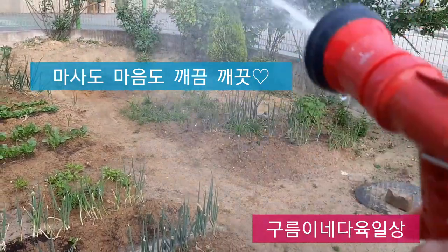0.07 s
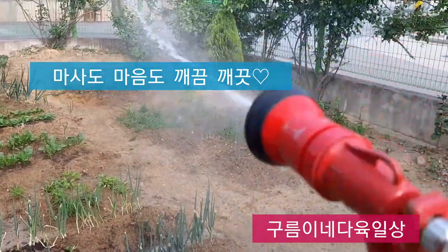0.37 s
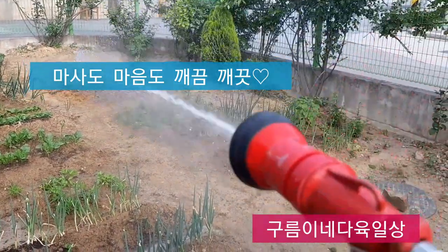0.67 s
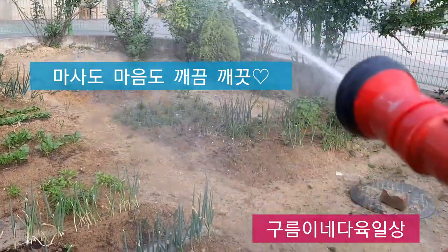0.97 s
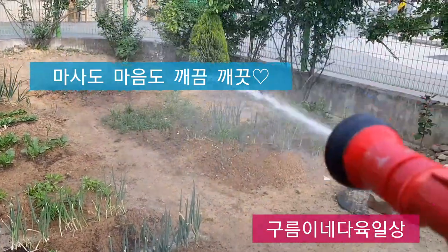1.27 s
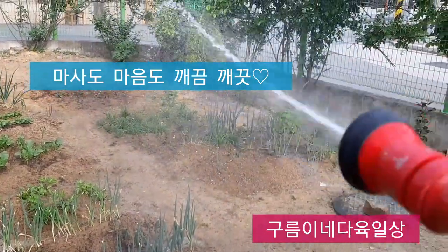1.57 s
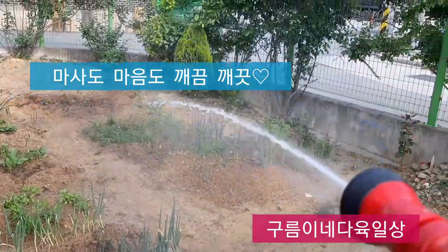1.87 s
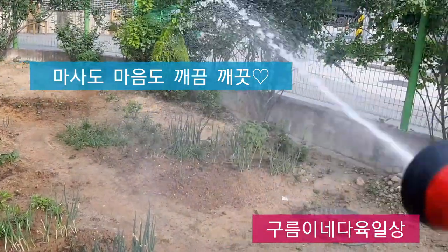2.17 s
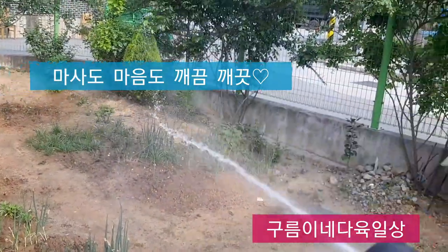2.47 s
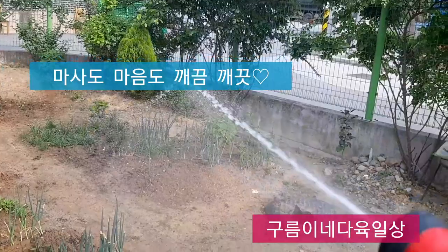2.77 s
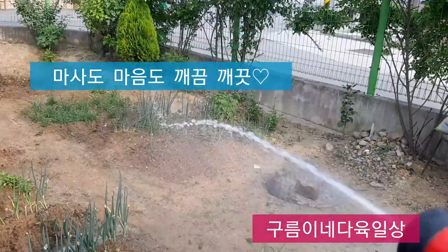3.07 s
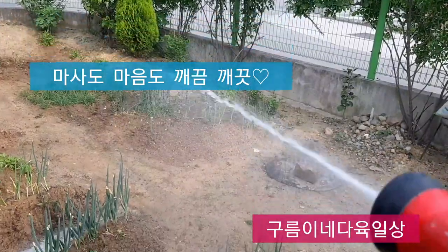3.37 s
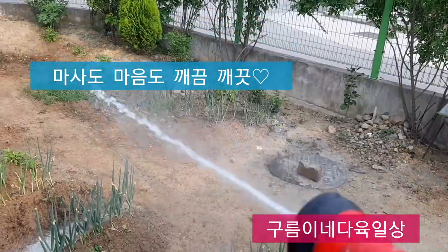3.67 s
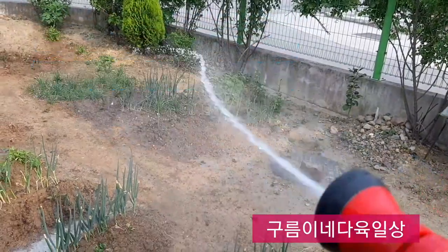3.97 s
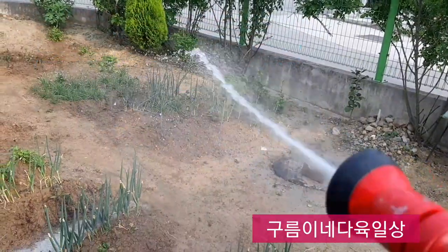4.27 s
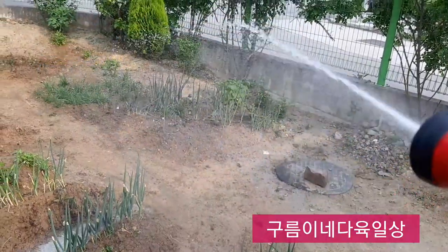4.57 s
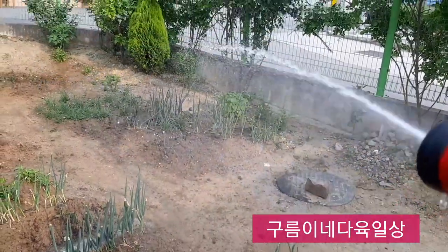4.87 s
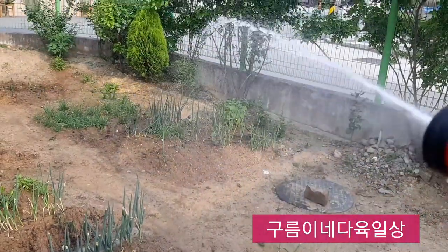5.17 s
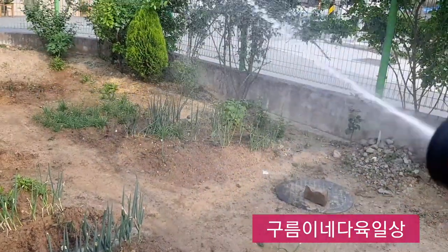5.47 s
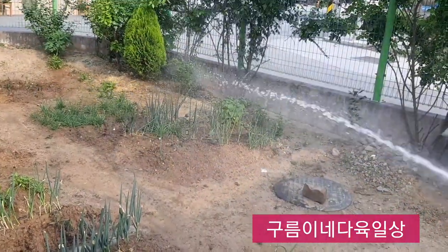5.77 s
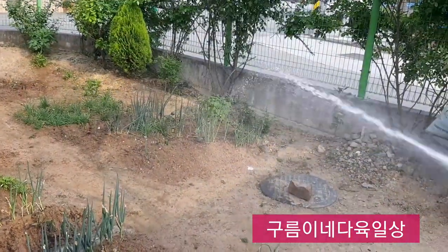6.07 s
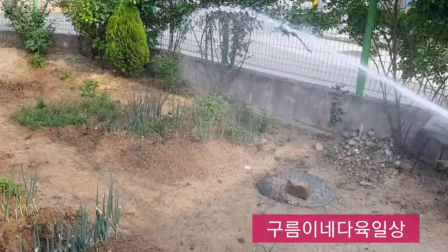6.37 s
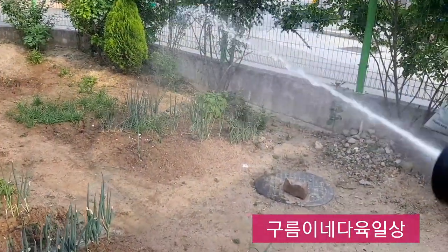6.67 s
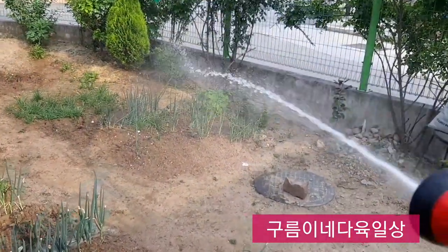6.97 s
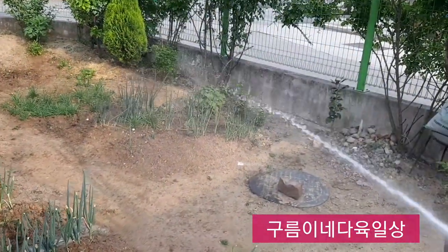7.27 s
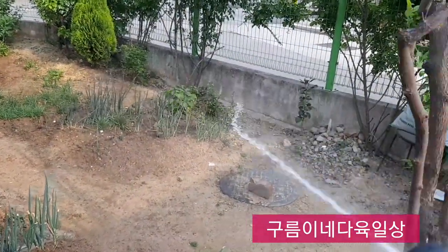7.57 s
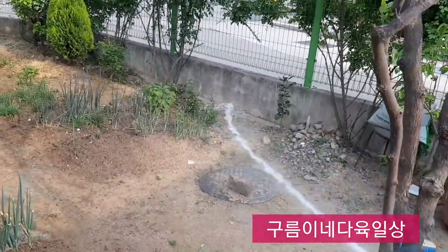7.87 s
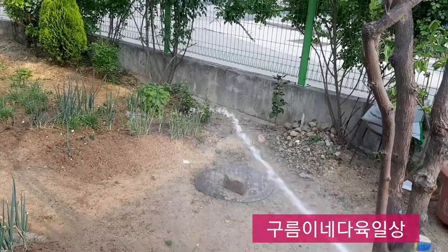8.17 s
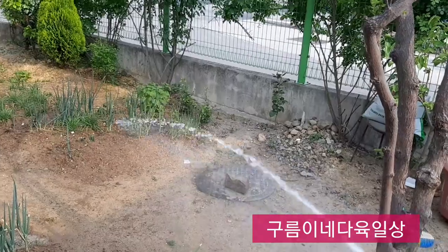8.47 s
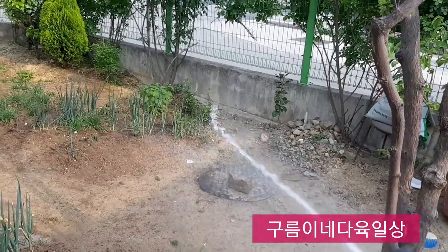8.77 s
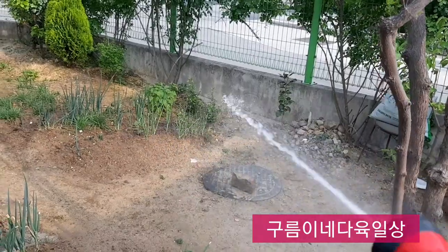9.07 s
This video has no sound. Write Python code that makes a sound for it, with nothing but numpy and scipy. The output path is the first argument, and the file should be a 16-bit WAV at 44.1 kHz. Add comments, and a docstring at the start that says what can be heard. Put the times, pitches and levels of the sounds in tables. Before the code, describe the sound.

Close, steady hiss of a sweeping garden hose spray, with water drumming on earth and ticking on leaves, and a low faraway rumble.

```python
"""A hose nozzle over a vegetable bed, close to a hand-held phone with two microphone ports.
From the start the jet hisses as it tears into drops, echoed by the gardener's body; further off, water
patters on soil and ticks on leaves, over a distant rumble and machine hum. The nozzle swings left and
back, then sweeps to and fro, and from about 3 s slugs of water drum on the soil. From 4.7 to 7.5 s it
stays to the right, hollow and ringing. Last come more quick strokes and slugs as the rumble rises."""
import sys
import numpy as np
from scipy import signal
from scipy.fft import rfft, irfft
from scipy.io import wavfile
from scipy.ndimage import uniform_filter1d, map_coordinates

SR = 44100
rng = np.random.default_rng(int(sys.argv[2]) if len(sys.argv) > 2 else 0)


def master_out(mix):
    """Clip the mix to full scale and print it as 16-bit PCM to the path in sys.argv[1]."""
    frames = np.transpose(np.atleast_2d(mix))
    ceiling = np.clip(frames, -1, 1)
    pcm = np.round(ceiling * 32767).astype(np.int16)
    wavfile.write(sys.argv[1], SR, pcm)


N = 401751
TIME = np.arange(N) / SR

# turning points of the sweep: time_s, lag_ms (left port behind right; positive with the nozzle to the right)
SWEEP_TURNS = [(0.17, .014), (0.65, -.1), (0.82, -.103), (0.97, .025), (2.02, .022), (2.26, .092),
               (2.56, .036), (3.37, .078), (3.79, -.028), (4.01, .097), (4.18, -.008), (4.33, .092),
               (4.49, .01), (4.68, .145), (5.55, .13), (6.05, .19), (6.35, .155), (7.52, .152),
               (7.75, .082), (7.92, .111), (8.11, .039), (8.27, .083), (8.46, -.02), (8.72, .082),
               (8.95, .056), (9.11, .112)]
# the hand brings the nozzle nearer or further: time_s, gain_db
NOZZLE_NEARNESS = [(0, 1.5), (0.65, -.3), (1.65, .6), (2.03, -.7), (2.26, 1.6), (2.47, -1), (3.8, .8),
                   (4.55, .1), (5.2, .7), (6.1, -1), (6.45, .7), (7.5, -.9), (8.2, -.6), (8.47, .6),
                   (8.8, -.6), (9.11, .1)]
# colour of the close hiss at each port: frequency_hz, gain_db
LEFT_HISS_COLOUR = [(500, -34), (1200, -23.5), (1800, -15), (2300, -11), (2750, -8.5), (3300, -2),
                    (4000, 2), (5000, 0.2), (6200, -5.5), (7400, -4.5), (8400, -13), (10500, -9.5),
                    (14000, -13), (15700, -15)]
RIGHT_HISS_COLOUR = [(500, -36), (1200, -27.5), (1800, -18.5), (2300, -15.5), (3000, -6.5), (3800, -3.0),
                     (4600, -0.53), (5300, -1), (6200, -3.5), (7000, -5.5), (8300, -16.5), (10800, -16.5),
                     (14000, -19), (15700, -19.5)]
# colour of the fine mist, of water on soil and of drops on leaves: frequency_hz, gain_db
MIST_COLOUR = [(1000, -3.5), (4000, -12.5), (7000, -5), (10000, 0), (15000, 1.5)]
SOIL_DRUM_COLOUR = [(100, -23), (250, -1.5), (450, -3.5), (800, 1.5), (1200, -9.5), (2000, -7.5),
                    (6000, -38)]
LEAF_TICK_COLOUR = [(400, -23.5), (1200, -12.5), (2200, -5), (4500, 2), (8000, -10), (15000, -9.5)]
# slugs of water landing on bare soil: start_s, length_s, level_db
WATER_SLUGS = [(2.85, 0.18, -54.5), (3.19, .22, -48.5), (3.65, 0.19, -52.5), (4.41, .07, -50),
               (4.66, 0.12, -57), (6.1, .2, -57), (7.86, .11, -47.5), (8.25, .09, -51), (8.58, 0.071, -51),
               (8.82, 0.25, -54.5)]
# colour of the distant rumble, mid and side: frequency_hz, gain_db
RUMBLE_MID_COLOUR = [(20, -27), (40, -17), (60, -7), (100, -1.5), (122, -5.5), (150, 3), (220, 1.5),
                     (310, -7), (460, -14), (750, -10), (1150, -18), (3000, -25)]
RUMBLE_SIDE_COLOUR = [(20, -18), (90, -6), (220, 0.5), (450, -3), (800, 1), (1300, -1), (3000, -20)]
# course of the rumble's mid signal: time_s, level_db
RUMBLE_COURSE = [(0, -53.5), (7.4, -52.5), (9.11, -49)]
# tones of a distant machine: pitch_hz, level_db, swell_share (0-1, of both throb and swells)
MACHINE_TONES = [(91.5, -67, .7), (162, -58.5, 1), (360, -73.5, .2), (602.5, -69.5, .1)]
# brief swells of the machine: peak_s, rise_db
MACHINE_SWELLS = [(1.3, 7), (5.6, 6)]


def nozzle():
    """Close up: a compact hiss at the nozzle mouth, moving across the ports, and a wide fizz of mist."""
    lag_ms = hand_sweep(SWEEP_TURNS)
    near_db = curve(NOZZLE_NEARNESS) + 0.2 * walk(6)  # the hand wobbles
    left_db = -27.5 - 10 * lag_ms + near_db
    right_db = -24 + 2.5 * lag_ms + near_db
    body_sway_ms = 0.008 * walk(2.005)
    jet = breakup()
    left, right = body_reflection(jet, lag_ms, body_sway_ms)
    left, right = phone_shade(delay(left, lag_ms / 2), delay(right, -lag_ms / 2), lag_ms)
    ports = []
    for direct, points, db in ((left, LEFT_HISS_COLOUR, left_db), (right, RIGHT_HISS_COLOUR, right_db)):
        # the finest drops sound all along the fan, so the treble is the widest
        mist = colour(breakup(), MIST_COLOUR)
        heard = direct + undb(1) * mist + undb(-10.5) * surroundings(jet)
        ports.append(colour(heard, points) * undb(db))
    return np.array(ports)


def breakup(drops_per_s=9000, spread_db=1.75, air_db=-1, flutter_db=0.5):
    """The jet tearing up: dense droplet snaps in rushing air, fluttering a little."""
    snaps = drops(drops_per_s, spread_db)
    air = undb(air_db) * rng.standard_normal(N)
    return unit(snaps + air) * undb(flutter_db * walk(45))


def hand_sweep(turns):
    """The hand's motion: it slows to rest at each turning point."""
    turn_s, place = np.transpose(turns)
    stroke = np.interp(TIME, turn_s, np.arange(len(turn_s)))
    eased = np.floor(stroke) + np.sin(np.pi / 2 * (stroke % 1)) ** 2
    return np.interp(eased, np.arange(len(turn_s)), place)


def body_reflection(jet, lag_ms, sway_ms, left_ms=1.325, right_ms=1.205, settle_s=0.8):
    """The jet plus its echo off the gardener, which grows as the arm settles to the right."""
    settled_lag_ms = uniform_filter1d(lag_ms, int(settle_s * SR))
    strength = np.clip(0.063 + 1.65 * settled_lag_ms, 0, 1)
    # clothing swallows the treble of the echo, and each port meets it in its own phase
    echo = strength * band(jet, 3300, 12000)
    return jet + 0.71 * delay(echo, left_ms + sway_ms), jet - delay(echo, right_ms + sway_ms)


def phone_shade(left, right, lag_ms):
    """With the nozzle to the right, the phone shades the left port; the right, facing it, rings."""
    shade = np.clip((lag_ms - 0.07) / 0.18, 0, 0.6)
    left = left - shade * band(left, 6400, 2200)
    right = right + 0.64 * shade * band(right, 5400, 630)
    # the hiss also turns hollow there, at a slightly different pitch in each port
    left = left - 1.1 * shade * band(left, 2620, 350)
    right = right - 0.7 * shade * band(right, 2270, 350)
    return left, right


def surroundings(jet, count=12, first_ms=2.2, last_ms=12, sway_ms=0.062):
    """Weak echoes from arm, ground and wall that drift as the hand moves."""
    echoes = 0
    for ms in rng.uniform(first_ms, last_ms, count):
        path_s = (ms + sway_ms * walk(1.5)) / 1000
        echoes = echoes + rng.choice([-1, 1]) * np.interp(TIME - path_s, TIME, jet)
    return unit(echoes)


def water_on_soil(patter_db=-60):
    """Further off, a little to the right: slugs of water drum on the soil over a steady patter."""
    slug_power = sum((undb(db) * slug(start_s, length_s)) ** 2 for start_s, length_s, db in WATER_SLUGS)
    envelope = np.sqrt(undb(patter_db) ** 2 + slug_power)
    drumming = landing(SOIL_DRUM_COLOUR, drops_per_s=900, spread_db=3)
    return drumming * envelope * undb(2 * walk(45)) * undb([[-0.5], [1.3]])


def slug(start_s, length_s, attack_s=0.04, decay_s=0.076):
    """Envelope of a slug of water: it is full by start_s, pours, and its splash dies away."""
    attack = np.clip((TIME - start_s) / attack_s + 1, 0, 1)
    return attack * np.exp(-np.maximum(TIME - start_s - length_s, 0) / decay_s)


def water_on_leaves():
    """Stray drops tick on the leaves across the bed."""
    return landing(LEAF_TICK_COLOUR, drops_per_s=500, spread_db=3.2) * undb(-44 + 1.5 * walk(4))


def landing(points, drops_per_s, spread_db, width=0.93):
    """Drops striking soil or foliage: one stream common to both ports, plus one for each; rms 1."""
    centre = drops(drops_per_s, spread_db)
    ports = [centre + width * drops(drops_per_s, spread_db) for _ in range(2)]
    return colour(np.array(ports), points)


def drops(per_s, spread_db):
    """Randomly timed impacts, many small and a few large; rms 1."""
    count = int(per_s * N / SR)
    size = undb(spread_db * np.minimum(rng.exponential(size=count), 5))
    return unit(np.bincount(rng.integers(N, size=count), size * rng.choice([-1, 1], count), N))


def distant_rumble():
    """The neighbourhood's low rumble, much the same at both ports in the bass."""
    mid = colour(rng.standard_normal(N), RUMBLE_MID_COLOUR)
    side = undb(-6.5) * colour(rng.standard_normal(N), RUMBLE_SIDE_COLOUR)
    return np.array([mid + side, mid - side]) * undb(curve(RUMBLE_COURSE) + 0.82 * walk(2.98))


def distant_machine(throb_hz=2.5, throb_peak_s=3.85, swell_width_s=0.18):
    """A far-off machine drones in wavering tones that throb steadily and swell twice."""
    throb_db = 1.5 * np.cos(2 * np.pi * throb_hz * (TIME - throb_peak_s))
    swell_db = sum(db * np.exp(-((TIME - peak_s) / swell_width_s) ** 2) for peak_s, db in MACHINE_SWELLS)
    hum = 0
    for pitch_hz, level_db, swell_share in MACHINE_TONES:
        phase = 2 * np.pi * np.cumsum(pitch_hz + 0.2 * np.sqrt(pitch_hz) * walk(20)) / SR
        tone_db = level_db + swell_share * (throb_db + swell_db) + 1.8 * walk(6)
        hum = hum + np.sqrt(2) * np.sin(phase) * undb(tone_db)
    return hum


def colour(x, points, size=16384):
    """Causal filter with a (Hz, dB) spectrum, so its resonances also turn the phase; rms 1."""
    hz, db = np.transpose(points)
    log_hz = np.log(np.fft.rfftfreq(size, 1 / SR) + 1)
    gain = undb(np.interp(log_hz, np.log(hz), db))
    cepstrum = irfft(np.log(gain))
    response = irfft(np.exp(rfft(2 * cepstrum[:size // 2], size)))[:size // 2]
    return unit(np.apply_along_axis(signal.oaconvolve, -1, x, response)[..., :N])


def band(x, hz, width_hz):
    """One resonance, gain 1 at its centre."""
    return signal.lfilter(*signal.iirpeak(hz, hz / width_hz, fs=SR), x)


def delay(x, ms):
    """The sound after a path whose length changes."""
    return map_coordinates(x, [np.arange(N) - ms * SR / 1000], order=3)


def walk(per_s):
    """Random levels held 1 / per_s seconds and smoothed twice; rms 1."""
    hold = max(int(SR / per_s), 1)
    held = np.repeat(rng.standard_normal(N // hold + 2), hold)[rng.integers(hold):][:N]
    return unit(uniform_filter1d(uniform_filter1d(held, hold), hold))


def curve(table):
    """Rows of (time_s, value) joined by straight lines."""
    return np.interp(TIME, *np.transpose(table))


def undb(db):
    """Decibels to gain."""
    return 10 ** (np.asarray(db) / 20)


def unit(x):
    """Scale to rms 1."""
    return x / np.sqrt(np.mean(x ** 2))


def scene():
    """Nozzle up close, water landing beyond it, and the neighbourhood far off, slightly to the right."""
    watering = nozzle() + water_on_soil() + water_on_leaves()
    background = distant_rumble() + distant_machine()
    return watering + background * undb([[-0.6], [0.6]])


def record(dry):
    """The phone cuts the treble steeply above 15750 Hz."""
    return signal.sosfilt(signal.ellip(12, 0.1, 80, 15750, fs=SR, output="sos"), dry)


dry = scene()
out = record(dry)
master_out(out)
```